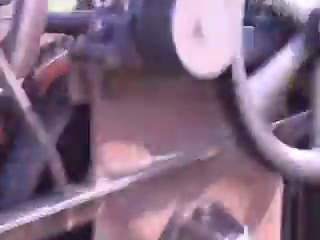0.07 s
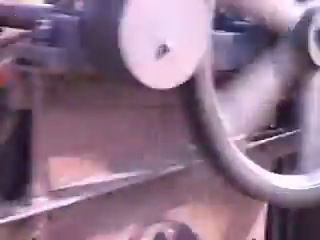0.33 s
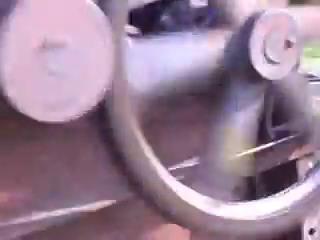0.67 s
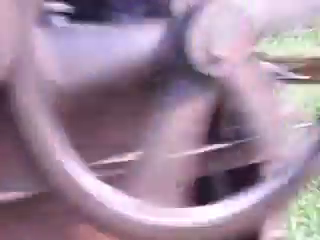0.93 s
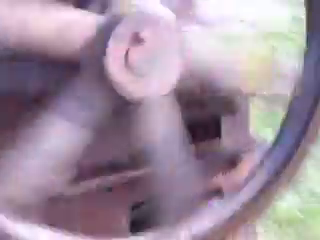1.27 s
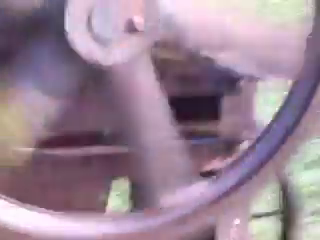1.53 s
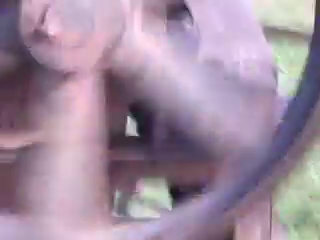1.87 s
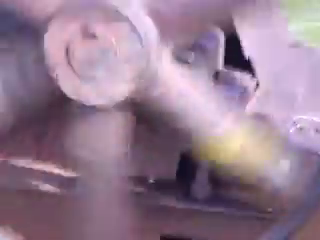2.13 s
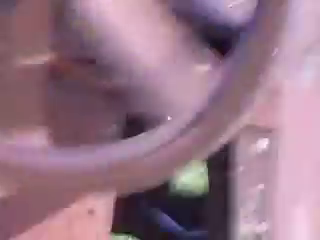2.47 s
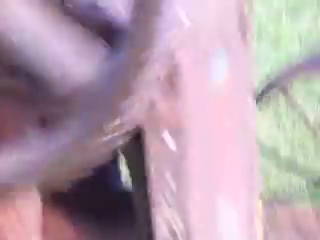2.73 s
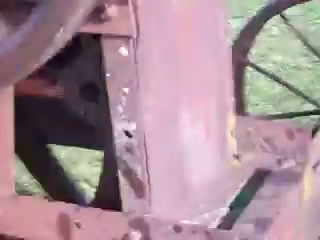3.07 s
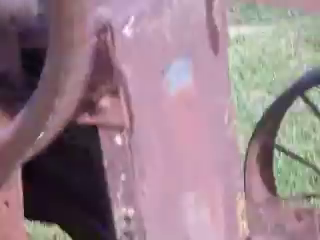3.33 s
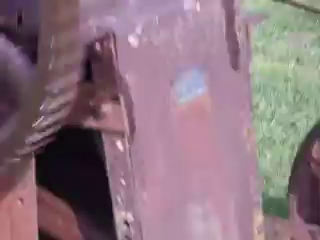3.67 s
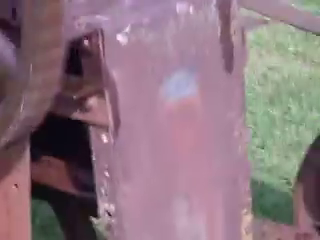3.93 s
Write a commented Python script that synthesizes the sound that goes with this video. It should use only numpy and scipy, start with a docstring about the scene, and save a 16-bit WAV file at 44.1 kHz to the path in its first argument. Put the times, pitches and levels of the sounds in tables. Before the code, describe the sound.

An old hay press runs outdoors, its gears rattling and iron parts clanking over a drone. As the close hand-held microphone passes the flywheel, wind rumbles with dull bumps; then the rattle fades, leaving separate clanks and dry rasps.

```python
"""Antique hay press, walking past

Outdoors, close to the running press, on a hand-held microphone moving along its side. Loose gear teeth
rattle and iron parts clank and ring over the drone of the drive. At the flywheel, wind rumbles under dull
handling knocks; past it the rattle fades, and single clanks and the rasp of the ram stand out.
The narrow-band recorder rounds off and clips the loudest blows."""
import sys
import numpy as np
from scipy import signal
from scipy.fft import rfft, irfft
from scipy.io import wavfile

SR = 44100
rng = np.random.default_rng(int(sys.argv[2]) if len(sys.argv) > 2 else 0)


def bounce(signal):
    """Save signal as a 16-bit WAV file at the path given by the first command-line argument."""
    frames = np.transpose(np.atleast_2d(signal))
    limited = np.clip(frames, -1, 1)
    pcm = np.round(limited * 32767).astype(np.int16)
    wavfile.write(sys.argv[1], SR, pcm)


N = 176400

# Modes of the ironwork, in groups that ring together: f/Hz, relative level/dB, t60/s
LOW_MODES = [(616, -11, .35), (897, -6, .2), (938, -1.5, .46)]
MIDDLE_MODES = [(655, -7, .14), (720, -5, .11), (1160, -2.5, .48)]
HIGH_MODES = [(1995, -6, .09), (2033, -3, .27), (2131, -8, .25)]
KNOCK_MODES = [(1511, -9, .15), (1585, -15, .2), (1806, -16, .12)]
CRACK_MODES = [(2562, -7, .3), (2709, -15, .2), (3382, -17, .15)]
# Tone of each noise at the microphone: f/Hz, relative level/dB
RATTLE_SPECTRUM = [(60, -11), (130, -7.5), (210, -2), (300, 6), (450, -1.5), (700, 0), (1400, 1.5),
                   (2100, -2), (3000, -2), (4400, -25)]
DRONE_SPECTRUM = [(20, 0), (280, 0.5), (390, -13), (670, 9.5), (850, 1.5), (1300, -7), (3800, -15.5),
                  (4500, -42.5)]
KNOCK_SPECTRUM = [(100, -24), (300, -1.5), (700, 2), (1000, 11.5), (1500, 4), (2000, 3.5), (2600, -15.5),
                  (4400, -26.5)]
CRACK_SPECTRUM = [(500, -22.5), (1700, -1.5), (2400, 4), (3000, 3.5), (3500, 0), (4000, -8.5),
                  (4500, -54.5)]
WIND_SPECTRUM = [(50, 6.5), (250, -2), (2000, -43)]
BUMP_SPECTRUM = [(70, -4), (280, -0.5), (550, -5), (4000, -21)]
RASP_SPECTRUM = [(200, -14), (800, -7.5), (1400, -1.5), (2000, 4), (2500, 5.5), (3300, 1.5), (4000, -7.5),
                 (4500, -28.5)]
# Rise and fall of the running sounds on the walk along the press: t/s, level/dB
RATTLE_FADE = [(0, -17.5), (.25, -21.5), (.3, -20.5), (.45, -22), (.515, -25), (.6, -19), (1.45, -18.5),
               (1.6, -23), (2.1, -22), (2.2, -34.5), (2.7, -41.5), (3.0, -34.5), (3.5, -28), (4, -39)]
DRONE_FADE = [(0, -27), (2.38, -29), (2.54, -20.5), (2.68, -27.5), (3.5, -24), (3.77, -28)]
WIND_FADE = [(1.7, -47), (1.8, -33.5), (2.15, -25), (2.25, -33.5), (2.55, -31.5), (2.75, -46.5)]
# Iron striking iron: t/s, then relative level/dB of knock, crack, low, middle and high ring
IRON_BLOWS = [(0.0074, -17.5, -11.5, -13, -11.5, -12.5), (0.203, -10, -12, -29, -30.5, -25.5),
              (0.2662, -7.5, -7, -17, -28, -25), (0.324, -22, -11, -31, -23, -24),
              (0.366, -7, -15, -20, -34, -16.5), (0.4049, -12.5, -10.5, -12, -14.5, -17.5),
              (0.467, -11.5, -15, -18.5, -25, -29), (0.5299, -13, -12, -46, -46, -35),
              (0.5496, -5, -23.5, -27, -45, -6.5), (0.5971, -3.5, -8.5, -11.5, -42, -25),
              (0.609, -29, -10, -15.5, -26, -31), (0.666, -10.5, -6.5, -16, -36.5, -31),
              (0.8152, -11.5, -20.5, -10.5, -31, -15), (0.9138, -13.5, -14.5, -10.5, -27, -18),
              (0.938, -18.5, -14, -16, -21, -23), (1.0815, -7, -7, -22, -33, -20),
              (1.151, -19.5, -23.5, -9, -27.5, -34), (1.185, -22.5, -15, -13, -30, -37.5),
              (1.2287, -16.5, -17, -20, -23.5, -18), (1.318, -6, -11.5, -18, -15.5, -19.5),
              (1.4198, -12.5, -17, -29.5, -40, -22), (1.48, -15, -24.5, -17.5, -36, -11),
              (1.504, -8.5, -10.5, -31, -28, -22), (1.569, -19, -14.5, -22.5, -36.5, -36),
              (1.6453, -14, -15, -20, -39, -25.5), (1.745, -14, -18, -14, -17.5, -14),
              (1.956, -16, -20.5, -34, -33, -7.5), (1.9983, -12, -5.5, -16.5, -13.5, -8),
              (2.0274, -21.5, -15, -24, -23, -4), (2.0558, -24.5, -10.5, -14.5, -42, -21.5),
              (2.4968, -15.5, -20.5, -24.5, -16.5, -35), (2.7372, -9, -22.5, -22.5, -11, -25),
              (2.827, -24, -25, -20.5, -24.5, -22), (2.8803, -11, -22.5, -16.5, -13.5, -27),
              (2.9364, -16.5, -22, -27, -13, -13), (3.1301, -16, -28.5, -25, -13.5, -37),
              (3.3407, -13.5, -19.5, -17, -11, -13), (3.419, -9.5, -22.5, -16, -23, -10.5),
              (3.5559, -11.5, -25, -20.5, -7.5, -14), (3.624, -25.5, -23, -16.5, -48.5, -20),
              (3.8142, -14, -19.5, -14, -12, -17.5)]
# Single pitched iron rings, with a clank or between clanks: t/s, f/Hz, relative level/dB
IRON_PINGS = [(0.062, 3050, -10.5), (0.109, 2570, -14), (0.075, 1165, -33), (0.125, 938, -9.5),
              (0.404, 3030, -11), (0.435, 940, -12), (0.664, 2400, -7), (0.825, 1490, -9),
              (0.875, 2570, -15.5), (0.886, 938, -12.5), (1.176, 897, -13), (1.243, 1370, -15.5),
              (1.442, 897, -12.5), (1.48, 2550, -12.5), (1.944, 1270, -11.5), (2.07, 2370, -11.5),
              (3.132, 700, -18), (3.42, 1990, -18), (3.205, 2035, -20), (3.357, 2115, -13)]
# Dull handling knocks on the hand-held microphone: t/s, t60/s, level/dB
MIC_BUMPS = [(1.787, .07, -12), (1.85, 0.055, -14.5), (1.896, 0.022, -8.5), (2.009, 0.056, -18),
             (2.16, .1, -17), (2.32, 0.029, -19), (2.532, 0.17, -23.5)]
# Dry rasps of the sliding ram: t/s, rise/s, t60/s, level/dB
RAM_RASPS = [(2.128, 0.0012, 0.073, -15.5), (2.21, 0.051, 0.15, -24), (2.41, 0.03, 0.66, -20),
             (2.62, 0.0072, 0.081, -20), (3.07, 0.0031, 0.035, -21.5), (3.276, 0.0026, 0.042, -15.5),
             (3.44, 0.011, 0.095, -19.5), (3.668, 0.0055, 0.3, -18.5)]

TEETH_PER_S, TOOTH_T60_S, TOOTH_SCATTER_DB, GRIND_SHARE = 58, 0.067, 3, 0.52
LOW_SING_DB, UPPER_SING_DB, CLINK_DB = -3.5, -10, -5.5  # relative to the meshing teeth
CLINKS_PER_MODE_PER_S, CLINK_RANGE_DB = 9, 18
RING_DB, RING_ATTACK_S, RING_DETUNE, WAVER_DEPTH, WAVER_HZ = -0.5, .0025, .002, .24, 60
KNOCK_DB, KNOCK_ATTACK_S, KNOCK_HOLD_S, KNOCK_T60_S = -6.5, .002, 0.014, 0.13
CRACK_DB, CRACK_ATTACK_S, CRACK_HOLD_S, CRACK_T60_S = -4, .0015, 0.0088, 0.093
PING_T60_CYCLES, PAIR_RATIO, PAIR_DB = 220, 1.035, -5
SOFT_LEVEL, BAND_HZ, CLIP_LEVEL, TOP_HZ = 0.67, 4260, 0.67, 15900


def undb(db):
    """Decibels to gain."""
    return 10 ** (np.asarray(db) / 20)


def unit(x):
    """Scale to rms 1."""
    return x / np.sqrt(np.mean(x ** 2) + 1e-18)


def fade(points):
    """Gain over time from points of t/s, level/dB."""
    return undb(np.interp(np.arange(N) / SR, *np.array(points).T))


def colour(x, spectrum):
    """Filter by points of f/Hz, level/dB, keeping the power of white noise."""
    hz, db = np.array(spectrum).T
    f = np.maximum(np.fft.rfftfreq(2 * N, 1 / SR), 1)
    gain = undb(np.interp(np.log(f), np.log(hz), db))
    gain /= np.sqrt(1 + (f / hz[-1]) ** 20)  # steep roll-off above the last point
    return irfft(rfft(x, 2 * N) * unit(gain))[:N]


def add(out, at_s, x):
    """Mix x into out from a given time."""
    i = int(np.clip(at_s * SR, 0, N - 1))
    out[i:i + len(x)] += x[:N - i]


def envelope(attack_s, hold_s, t60_s):
    """One second of rise, hold and exponential release."""
    t = np.arange(SR) / SR
    release = np.exp(-np.log(1000) * np.maximum(t - attack_s - hold_s, 0) / t60_s)
    return np.minimum(t / attack_s, 1) * release


def grit(spread_db, grain_hz):
    """Noise of tiny contacts whose force changes from grain to grain."""
    force = np.interp(np.arange(N) / SR * grain_hz, np.arange(N), rng.standard_normal(N))
    return unit(rng.standard_normal(N) * undb(spread_db * force))


def bursts(rows, spectrum, texture, hold_s=0):
    """Coloured noise bursts from rows of t/s, rise/s, t60/s, level/dB."""
    power = np.zeros(N)
    for at, rise, t60, db in rows:
        add(power, at, (undb(db) * envelope(rise, hold_s, t60)) ** 2)
    return colour(np.sqrt(power) * texture, spectrum)


def ring(times, levels_db, modes):
    """Each blow rings the modes slightly detuned; rattling contacts make the ring waver."""
    out, t = np.zeros(N), np.arange(SR // 2) / SR
    for hz, db, t60 in modes:
        shape = undb(db + RING_DB) * envelope(RING_ATTACK_S, 0, t60)[:len(t)]
        tunings = 1 + RING_DETUNE * rng.standard_normal(len(times))
        mode = np.zeros(N, complex)
        for at, blow_db, tuning in zip(times, levels_db, tunings):
            add(mode, at, undb(blow_db) * shape * np.exp(2j * np.pi * hz * (at + t * tuning)))
        knots = rng.standard_normal((int(WAVER_HZ * N / SR) + 2, 2)) @ [1, 1j]  # level and phase
        waver = np.interp(np.arange(N) / SR * WAVER_HZ, np.arange(len(knots)), knots)
        out += np.imag(mode * (1 + WAVER_DEPTH * waver))
    return out


def resonate(force, modes):
    """Modes kept ringing by a continuous force, at rms 1."""
    t = np.arange(SR) / SR
    response = sum(undb(db - 60 * t / t60) * np.sin(2 * np.pi * hz * t) for hz, db, t60 in modes)
    return unit(signal.fftconvolve(force, response)[:N])


def gears():
    """Worn teeth meet unevenly, grind and keep the iron singing, fading as the microphone moves on."""
    slip, force = rng.standard_normal((N // 500, 2)).T
    times = (np.arange(len(slip)) + 0.18 * slip) / TEETH_PER_S
    contacts = [(at, .001, TOOTH_T60_S, db)
                for at, db in zip(times, TOOTH_SCATTER_DB * force) if at < N / SR]
    teeth = bursts(contacts, RATTLE_SPECTRUM, grit(spread_db=3, grain_hz=895))
    grind = colour(grit(spread_db=0.5, grain_hz=393), RATTLE_SPECTRUM)
    mesh = unit(unit(teeth) + GRIND_SHARE * grind)
    singing = undb(LOW_SING_DB) * resonate(mesh, LOW_MODES)
    singing += undb(UPPER_SING_DB) * resonate(mesh, MIDDLE_MODES + HIGH_MODES + KNOCK_MODES + CRACK_MODES)
    return (mesh + singing + clinks()) * fade(RATTLE_FADE)


def clinks():
    """Small loose parts tap the ironwork at scattered times; each tap rings one of its high modes."""
    out = np.zeros(N)
    for hz, db, t60 in HIGH_MODES + KNOCK_MODES + CRACK_MODES:
        when, force = rng.random((int(CLINKS_PER_MODE_PER_S * N / SR), 2)).T
        out += ring(when * N / SR, CLINK_RANGE_DB * force, [(hz, db / 2, t60)])
    return undb(CLINK_DB) * unit(out)


def drive():
    """The running drive drones, rough and hollow, all along the side of the press."""
    return colour(grit(spread_db=3, grain_hz=89.45), DRONE_SPECTRUM) * fade(DRONE_FADE)


def clanks():
    """Loose iron parts collide close by: a chattering knock, a bright crack and ringing castings."""
    times, knock, crack, low, middle, high = np.array(IRON_BLOWS).T
    knock_rows = [(at, KNOCK_ATTACK_S, KNOCK_T60_S, db + KNOCK_DB) for at, db in zip(times, knock)]
    crack_rows = [(at, CRACK_ATTACK_S, CRACK_T60_S, db + CRACK_DB) for at, db in zip(times, crack)]
    knocks = bursts(knock_rows, KNOCK_SPECTRUM, grit(spread_db=7, grain_hz=678), KNOCK_HOLD_S)
    cracks = bursts(crack_rows, CRACK_SPECTRUM, grit(spread_db=-1.5, grain_hz=494), CRACK_HOLD_S)
    groups = [(knock, KNOCK_MODES), (crack, CRACK_MODES),
              (low, LOW_MODES), (middle, MIDDLE_MODES), (high, HIGH_MODES)]
    return knocks + cracks + sum(ring(times, levels_db, modes) for levels_db, modes in groups)


def pings():
    """Single pitched iron rings, with or between clanks, each beating with a weaker mode just above."""
    out = np.zeros(N)
    for at, hz, db in IRON_PINGS:
        t60 = PING_T60_CYCLES / hz
        out += ring([at], [db], [(hz, 0, t60), (hz * PAIR_RATIO, PAIR_DB, t60 / 2)])
    return out


def wind():
    """Air from the flywheel rumbles on the passing microphone."""
    return colour(rng.standard_normal(N), WIND_SPECTRUM) * fade(WIND_FADE)


def handling():
    """Dull handling knocks on the hand-held microphone."""
    bump_rows = [(at, .0015, t60, db) for at, t60, db in MIC_BUMPS]
    return bursts(bump_rows, BUMP_SPECTRUM, rng.standard_normal(N))


def ram():
    """Past the flywheel, the ram is heard sliding and rasping along the steel chamber."""
    return bursts(RAM_RASPS, RASP_SPECTRUM, grit(spread_db=0, grain_hz=636))


def scene():
    """The whole press at one hand-held microphone, in mono."""
    return (clanks() + pings() + gears() + ram() + drive() + wind() + handling())[None]


def record(dry):
    """A narrow-band recorder rounds loud blows; the highest peaks clip into faint bright ticks."""
    rounded = dry / (1 + (dry / SOFT_LEVEL) ** 4) ** (1 / 4)
    narrow = signal.sosfilt(signal.cheby1(12, .2, BAND_HZ, fs=SR, output="sos"), rounded)
    clipped = np.clip(narrow, -CLIP_LEVEL, CLIP_LEVEL)
    return signal.sosfilt(signal.ellip(8, .2, 70, TOP_HZ, fs=SR, output="sos"), clipped)


dry = scene()
out = record(dry)
bounce(out)
```